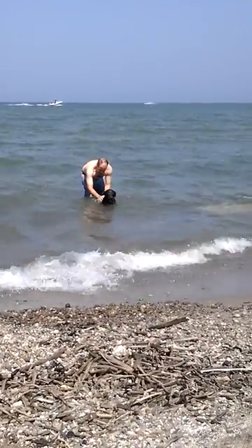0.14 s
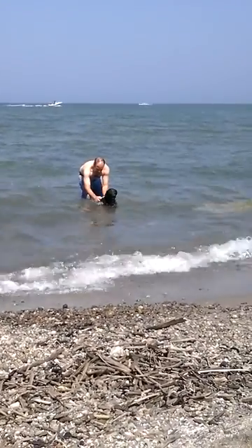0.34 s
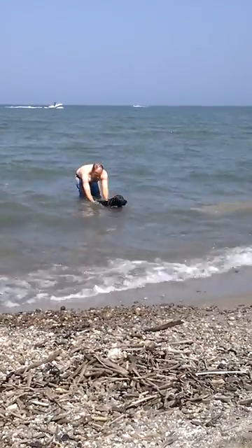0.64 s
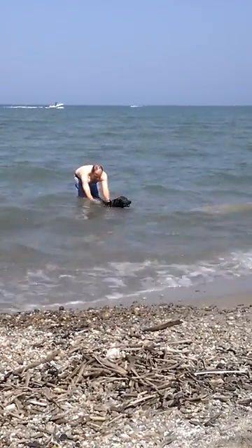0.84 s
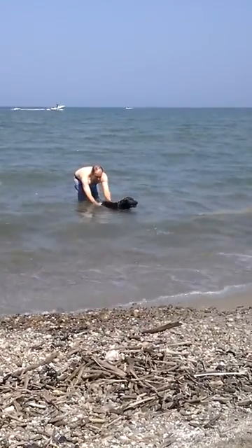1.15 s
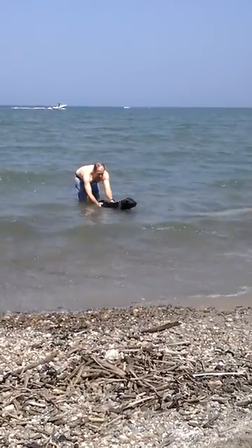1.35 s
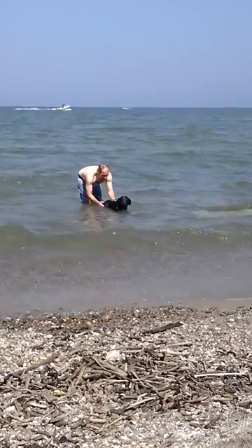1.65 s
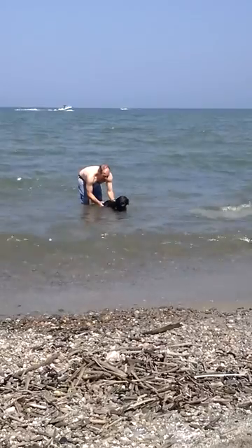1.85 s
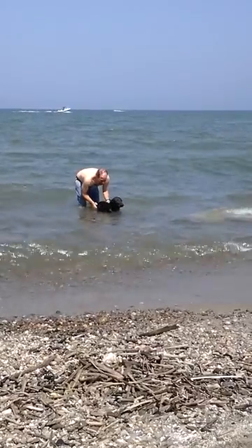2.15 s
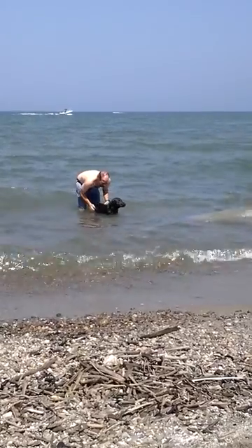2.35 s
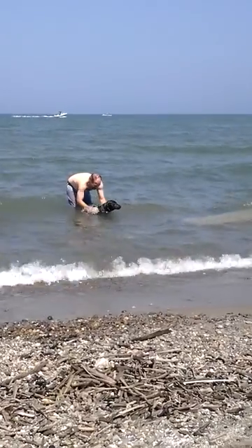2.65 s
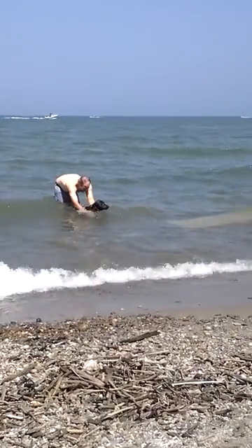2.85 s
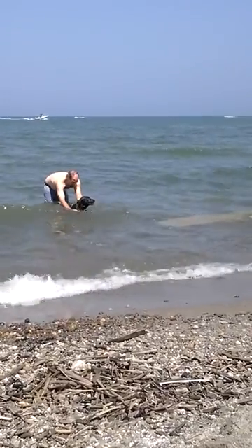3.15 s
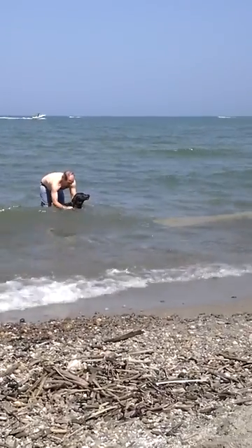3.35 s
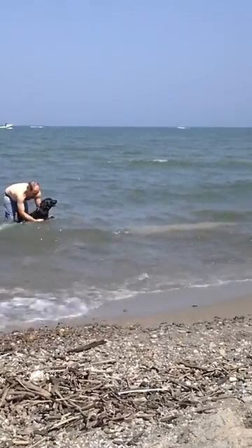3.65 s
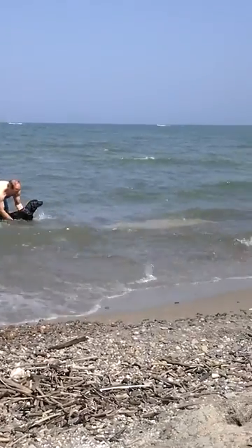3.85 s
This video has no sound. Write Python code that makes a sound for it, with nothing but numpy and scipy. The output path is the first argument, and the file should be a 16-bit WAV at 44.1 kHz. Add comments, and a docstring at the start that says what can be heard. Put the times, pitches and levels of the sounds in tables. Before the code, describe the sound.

Steady foamy surf on pebbles, a faint distant motorboat hum and one brief whistle.

```python
"""Small waves break on a pebbly lake shore: a broad wash of foam noise, in which trapped air bubbles
ring and falling crests slap the water. Far out a motorboat hums at multiples of its engine rate,
and air rumbles faintly on the microphone. One thin rising whistle, a nearly pure tone, perhaps
a shore bird, follows the second breaker. Both channels carry the same signal."""
import sys
import numpy as np
from scipy import signal
from scipy.fft import rfft, irfft
from scipy.io import wavfile
from scipy.ndimage import uniform_filter1d

SR = 44100
rng = np.random.default_rng(int(sys.argv[2]) if len(sys.argv) > 2 else 0)


def unload_audio(sound):
    """Save the sound as a 16-bit wav file, at the path given as the first command line argument."""
    columns = np.transpose(np.atleast_2d(sound))
    # keep every value between -1 and 1, then stretch to whole-number steps
    steps = np.round(np.clip(columns, -1, 1) * 32767)
    wavfile.write(sys.argv[1], SR, steps.astype(np.int16))


N = 176400

# The course of the waves. Each row: time in seconds, then relative levels in dB of six bands:
# low rush, lower body, upper body, churn, fizz and top hiss.
SURF_LEVELS = [(0.0, -33.5, -34.5, -34.5, -34, -32.5, -46), (0.1, -35, -32, -32, -29, -31.5, -43.5),
               (0.25, -35.5, -32.5, -31, -28.5, -33.0, -45.5), (0.42, -34, -32.5, -33, -30, -32, -44),
               (0.58, -41, -32.5, -32, -31, -35, -47), (0.75, -38.5, -31.5, -33.5, -30, -32.5, -45),
               (0.9, -38.5, -31.5, -33.5, -30.5, -34, -46.5),
               (1.05, -37.5, -33.5, -36.5, -31.5, -34, -43.5), (1.25, -38.5, -35, -33, -30.5, -33, -45.0),
               (1.5, -40, -35, -36, -32, -34.5, -47), (1.8, -38.5, -37, -35.0, -33.0, -34, -46.5),
               (2.05, -39, -34.5, -34, -32, -34, -47.0), (2.28, -39.5, -35, -32.5, -33, -34.0, -47),
               (2.45, -37.5, -34.0, -33, -30.5, -34, -46.5), (2.57, -38, -33.0, -29.5, -30, -32.5, -45.5),
               (2.615, -35, -35.5, -32.5, -28.5, -31, -42.5), (2.65, -35, -30.5, -29, -28.5, -29, -41),
               (2.7, -38.5, -30, -33, -28, -30, -42.5), (2.76, -34, -31.0, -30.5, -27, -32.5, -44.5),
               (2.83, -37.5, -33.5, -30.5, -29.5, -33.5, -46.5), (2.95, -40, -31.5, -32.5, -30, -34, -45.5),
               (3.1, -41.5, -33, -31, -32.5, -33.5, -45.5), (3.25, -38.5, -34.5, -31.5, -31.5, -34, -46.5),
               (3.42, -34.5, -33, -32, -31, -34, -46.0), (3.58, -40, -31, -33, -31.5, -34.5, -46.0),
               (3.7, -35, -36.5, -34, -31.5, -34.5, -45.5), (3.78, -37.5, -35.5, -31.5, -29, -34.0, -45.5),
               (3.9, -39, -32.0, -31, -29.5, -34.0, -46.5), (3.99, -37.5, -33.0, -31.5, -30, -34.0, -46)]
BAND_CENTRES_HZ = [250, 580, 1000, 2100, 4500, 8000]
# Fluctuation of the foam. Each entry: the weight, from 0 to 1, of the common flicker in one band.
BAND_FLICKER = [0.52, 0.88, 0.17, 1, 0.69, 0.9]
# Spectrum of the foam. Each row: frequency in Hz, relative spectral density in dB.
FOAM_SPECTRUM = [(30, -62), (70, -44), (100, -25), (130, -18), (165, -13), (250, -3), (442, -4), (595, 0),
                 (900, 0), (1220, -4.5), (1430, -2.5), (1700, -4), (2490, -5.5), (2900, -7.5), (5000, -9.5),
                 (6300, -17.5), (8350, -24), (9800, -31), (10300, -37.5), (11100, -55.5)]
# Engine harmonics. Each row: multiple of the engine rate, mean level in dB.
ENGINE_HARMONICS = [(2, -56), (3, -57.5), (4, -49), (5, -52), (6, -50)]
# Puffs of air. Each row: centre in seconds, length in seconds, level in dB.
AIR_PUFFS = [(.49, .05, -72), (1.09, .05, -68), (1.72, .05, -64), (2.1, .08, -68), (2.58, .06, -69),
             (2.794, .12, -57), (3.4, 0.054, -71), (3.53, .1, -62), (3.77, .07, -62)]
# Slaps of water. Each row: start in seconds, relative level in dB, pitch in Hz, click share from 0 to 1.
WATER_SLAPS = [(.279, -13, 740, 0.7), (.892, -14, 770, .2), (2.618, -12, 665, 0.15), (2.64, -7, 1410, 0.66),
               (2.666, -10, 1455, 0.53), (2.741, -8, 740, .6), (2.76, -11, 820, 0.24),
               (2.769, -11, 1405, 0.33), (3.688, -17, 700, .2), (3.745, -10, 793, 0.33),
               (3.878, -12, 870, 0.16), (3.904, -8, 754, .6)]
# Contour of the whistle. Each row: time in seconds, pitch in Hz, level in dB.
WHISTLE_CONTOUR = [(2.66, 2250, -60), (2.69, 2365, -45), (2.779, 2346, -42), (2.86, 2428, -37),
                   (2.96, 2450, -36.5), (3.04, 2468, -39), (3.08, 2435, -39.5), (3.17, 2486, -38),
                   (3.22, 2490, -47), (3.25, 2510, -70)]

TIME = np.arange(N) / SR


def amp(db):
    return 10 ** (np.asarray(db) / 20)


def unit_rms(x):
    return x / np.sqrt(np.mean(x ** 2) + 1e-20)


def bandpass(x, low_hz, high_hz):
    return signal.sosfilt(signal.butter(3, [low_hz, high_hz], "bandpass", fs=SR, output="sos"), x)


def drift(low_hz, high_hz, t=TIME[::256], at=TIME):
    """Sines of random phase superpose into a slow fluctuation, computed at times t and interpolated."""
    rates = np.geomspace(low_hz, high_hz, num=24)
    sines = sum(np.sin(2 * np.pi * (hz * t + rng.random())) / np.sqrt(hz) for hz in rates)
    return np.interp(at, t, unit_rms(sines))


def foam(level_db=-26, patch_db=0.92, flicker_db=0.56, swell_db=0.13):
    """Incoherent sources add up to noise; six bands of it rise and fall with the waves."""
    t = np.arange(N // 128 + 5) * 128 / SR
    log_hz = np.log(np.fft.rfftfreq(512, 1 / SR) + 1)
    across_bands = lambda weights: np.interp(log_hz, np.log(BAND_CENTRES_HZ), weights)[:, None]
    real, imag, patches = rng.standard_normal((len(t), 257, 3)).T
    patches = uniform_filter1d(patches, size=6, axis=0)  # smooth over frequency
    patches = uniform_filter1d(patches, size=24, axis=1)  # and over time
    times, *bands = np.transpose(SURF_LEVELS)
    waves = sum(across_bands(band) * np.interp(t, times, db - db.mean())
                for band, db in zip(np.eye(len(bands)), bands))
    flicker = flicker_db * drift(6, 40, t, at=t) + swell_db * drift(1.85, 6.8, t, at=t)
    gain = amp(waves + patch_db * unit_rms(patches) + across_bands(BAND_FLICKER) * flicker)
    noise = signal.istft((real + 1j * imag) * gain, nperseg=512, noverlap=384)[1][:N]
    hz, db = np.transpose(FOAM_SPECTRUM)
    colour = amp(np.interp(np.log(np.fft.rfftfreq(N, 1 / SR) + 1), np.log(hz + 1), db))
    return amp(level_db) * unit_rms(irfft(rfft(noise) * colour, N))


def bubbles(per_second=1500, spread_db=3.5, ring_cycles=7.4, rise=0.265, gain_db=-13):
    """Trapped air resonates in damped, rising notes, whose level follows the upper body of the surf."""
    times, _, _, upper_body_db = np.transpose(SURF_LEVELS)[:4]
    strength = amp(spread_db * np.minimum(rng.exponential(1, N), 5))
    onsets = strength * (rng.random(N) < per_second / SR)
    pitch_index = rng.integers(0, 24, N)
    t, out = TIME[:2048], np.zeros(N)
    for index, hz in enumerate(np.geomspace(403, 2560, num=24)):
        age = t * hz / ring_cycles
        note = age * np.exp(-4 * age) * np.sin(2 * np.pi * hz * t * (1 + rise * age))
        out += signal.oaconvolve(onsets * (pitch_index == index), note)[:N]
    return amp(gain_db + np.interp(TIME, times, upper_body_db)) * unit_rms(out)


def motorboat(engine_hz=69.55, waver_db=3, waver_rad=1.7, waver_hz=(0.307, 3.6)):
    """A periodic engine radiates harmonics, which waver in level and phase as they cross the water."""
    out = np.zeros(N)
    for multiple, db in ENGINE_HARMONICS:
        rms = amp(db + waver_db * drift(*waver_hz))
        phase = 2 * np.pi * (multiple * engine_hz * TIME + rng.random())
        out += np.sqrt(2) * rms * np.sin(phase + waver_rad * drift(*waver_hz))
    return out


def wind(level_db=-84.5, lump_db=6):
    """Pressure fluctuations of air on the microphone make a faint, uneven rumble with stronger puffs."""
    rumble = unit_rms(bandpass(rng.standard_normal(N), 60.3, 126))
    lumps = amp(level_db + lump_db * drift(1.5, 14))
    puffs = sum(amp(db) * np.exp(-(2 * (TIME - centre) / length) ** 2) for centre, length, db in AIR_PUFFS)
    return rumble * (lumps + puffs)


def slaps(click_s=0.00014, rise_s=0.00079, t60_s=0.028, gain_db=-0.5):
    """The impact of a falling crest gives a click and a hollow, quickly damped resonance."""
    t, out = TIME[:2048], np.zeros(N + 2048)
    click = (1 - t / click_s) * np.exp(-t / click_s)
    envelope = (1 - np.exp(-t / rise_s)) * amp(-60 * t / t60_s)
    for start, db, hz, click_share in WATER_SLAPS:
        note = envelope * np.sin(2 * np.pi * hz * t)
        slap = (1 - click_share) * note + click_share * click
        out[round(start * SR):][:len(t)] += amp(db + gain_db) * slap
    return bandpass(out[:N], 250, 6000)


def whistle(flutter_db=0.8):
    """A single sine glides upward, its phase the integral of its pitch, while its level flutters."""
    times, hz, db = np.transpose(WHISTLE_CONTOUR)
    level_db = np.interp(TIME, times, db, left=-150, right=-150) + flutter_db * drift(4.9, 30)
    phase = 2 * np.pi * np.cumsum(np.interp(TIME, times, hz)) / SR
    return np.sqrt(2) * amp(level_db) * np.sin(phase)


def scene():
    """The pressures of all sources superpose at one microphone."""
    mono = foam() + bubbles() + motorboat() + wind() + slaps() + whistle()
    return np.array([mono, mono])


def record(dry):
    """A steep low-pass filter limits the bandwidth to 11.1 kHz."""
    lowpass = signal.firwin(511, 11100, window=("kaiser", 9), fs=SR)
    return signal.oaconvolve(dry, lowpass[None], "same")


dry = scene()
out = record(dry)
unload_audio(out)
```